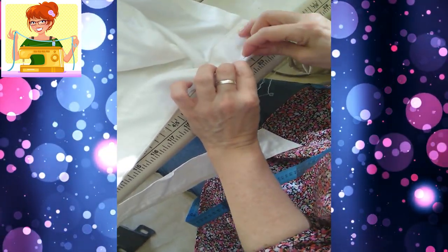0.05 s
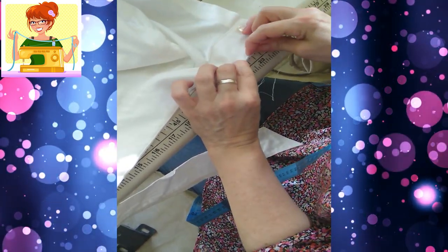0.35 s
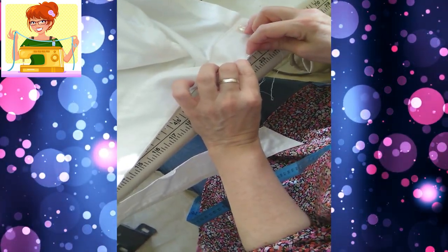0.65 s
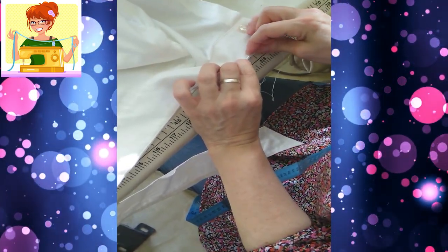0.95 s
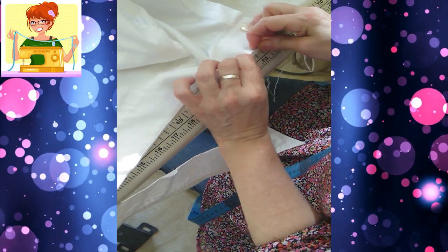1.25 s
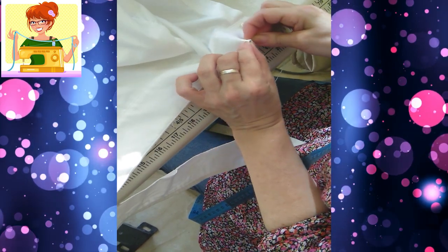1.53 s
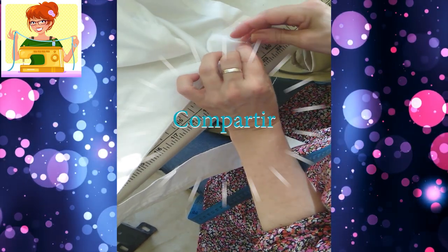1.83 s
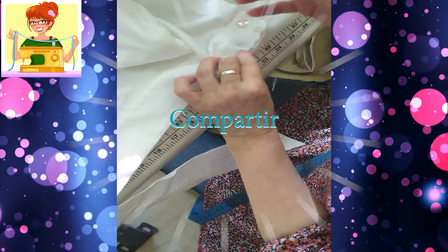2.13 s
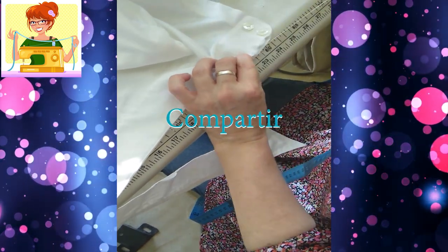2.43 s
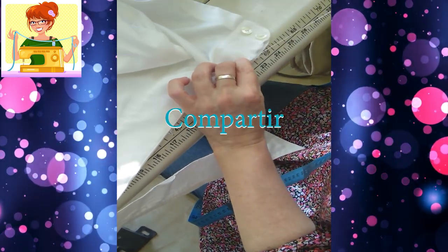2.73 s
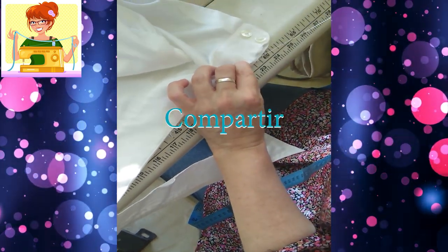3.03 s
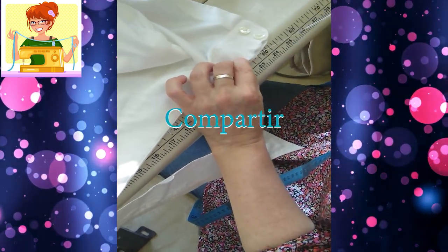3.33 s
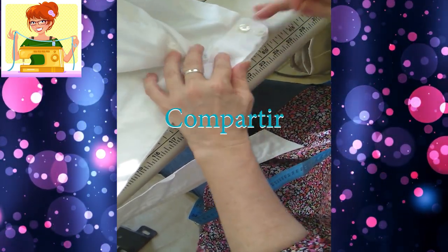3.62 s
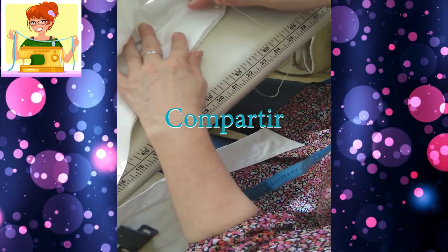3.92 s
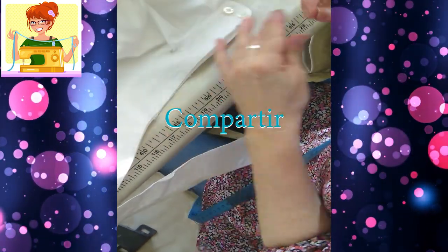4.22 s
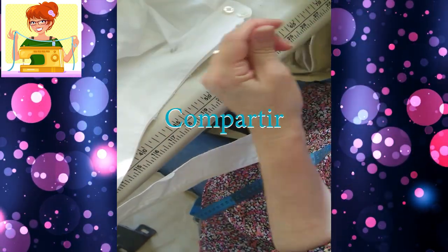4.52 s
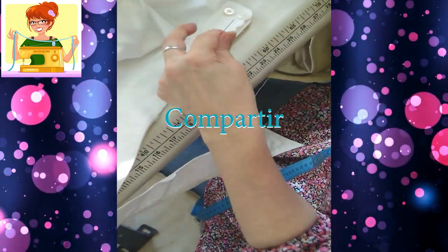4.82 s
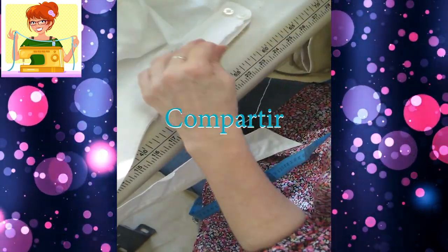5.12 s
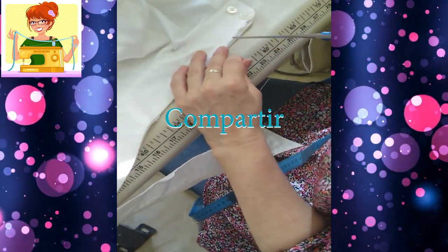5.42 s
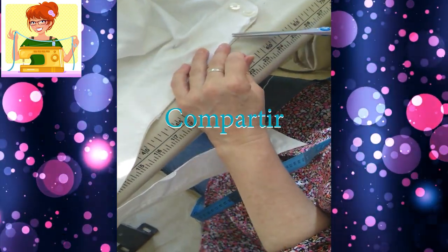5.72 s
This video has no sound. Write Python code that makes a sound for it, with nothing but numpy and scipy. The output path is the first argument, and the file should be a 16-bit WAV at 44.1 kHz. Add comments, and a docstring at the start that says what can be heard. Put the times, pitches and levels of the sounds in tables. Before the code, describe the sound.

Hands push and shift cloth on a table with dull thumps and faint rustling, then scissors click twice, over a low hum.

```python
"""Hands press and shift a shirt on a sewing table, close to the microphones. Pushes, firm and soft, with slips
between them, travel through the table as dull thumps, nearly all in the left channel, and leave its top
ringing. The cloth rustles, scratches and scuffs faintly. Near the end scissors click twice as they are picked
up, steel knocking on steel. Mains hum, room air and hiss go on underneath, with thin tones flickering high in
the treble."""
import sys
import numpy as np
from scipy import signal
from scipy.fft import rfft, irfft
from scipy.io import wavfile
from scipy.ndimage import uniform_filter1d

SR = 44100
rng = np.random.default_rng(int(sys.argv[2]) if len(sys.argv) > 2 else 0)


def output_pcm(signal):
    """Save a mono or channel-first signal as 16-bit PCM at the path in sys.argv[1].

    Samples are clipped to [-1, 1] before scaling.
    """
    pcm = np.clip(np.atleast_2d(signal).T, -1, 1) * 32767
    wavfile.write(sys.argv[1], SR, np.round(pcm).astype(np.int16))


N = 262836
T = np.arange(N) / SR

# the hands drag the cloth between pushes: (start [s], length [s], level [dB])
HAND_DRAGS = [(0, 0.048, -11.5), (0.179, 0.044, -17), (0.274, 0.053, -12.5), (0.569, 0.054, -19),
              (.655, 0.093, -15), (.735, 0.097, -19), (1.007, 0.084, -26), (1.158, 0.063, -21),
              (1.413, 0.11, -23.5), (1.616, 0.062, -27.5), (1.81, 0.078, -31), (2.176, 0.035, -31),
              (2.298, 0.045, -32.5), (2.42, 0.046, -35.5), (2.545, 0.056, -29), (2.813, 0.098, -39),
              (3.046, 0.096, -33.5), (3.41, 0.055, -19), (3.502, 0.072, -30), (3.598, 0.073, -28),
              (3.693, 0.038, -22.5), (4.003, 0.13, -35.5), (4.21, 0.071, -23), (4.69, 0.11, -28.5),
              (4.957, 0.041, -34), (5.138, 0.069, -31), (5.322, 0.059, -28), (5.632, 0.12, -23),
              (5.777, .16, -27)]


def undb(db):
    """Turn decibels into a number to multiply by."""
    return 10 ** (np.asarray(db) / 20)


def unit(x):
    """Scale a signal to an average (rms) size of 1."""
    return x / np.sqrt(np.mean(x ** 2))


def colour(x, hz, db):
    """Make some pitches louder and others softer, along a curve through the given points."""
    bin_hz = np.maximum(np.fft.rfftfreq(N, 1 / SR), 1)
    curve_db = np.interp(np.log(bin_hz), np.log(hz), db)
    return irfft(rfft(x) * undb(curve_db), N)


def band(x, hz, width_hz):
    """Keep the sound near one pitch by passing it through a resonance three times."""
    for _ in range(3):
        x = signal.lfilter(*signal.iirpeak(hz, hz / (2 * width_hz), fs=SR), x)
    return x


def walk(per_s):
    """A random wander of size about 1 that takes a new turn per_s times a second."""
    step = int(SR / per_s)
    stairs = np.repeat(rng.standard_normal(N // step + 1), step)
    return unit(uniform_filter1d(stairs, step)[:N])


def leftish(x, right_db):
    """A sound that reaches the right channel weaker than the left."""
    return np.array([x, x * undb(right_db)])


def effort_db(rise_db_per_s=904, fall_db_per_s=343, rest_db=-40.0):
    """How hard the hands drag: effort builds, holds and dies away; resting hands still stir a little."""
    t = T[::64]
    level = np.full(len(t), rest_db)
    for start, length, db in HAND_DRAGS:
        before = rise_db_per_s * np.maximum(start - t, 0)
        after = fall_db_per_s * np.maximum(t - start - length, 0)
        level = np.maximum(level, db - before - after)
    return np.interp(T, t, level)


def pushes(slip_gap_s=0.019, slip_hz=108, scatter=0.091, spread_db=1):
    """List the distinct pushes and knocks, and add the slips between them as a dragging hand sticks and lets
    go."""
    # distinct pushes and knocks of the hands on the table, firm and soft: (time [s], level [dB], thump pitch
    # [Hz])
    listed_pushes = [(.009, -16, 167), (0.038, -20, 171), (.196, -15, 97), (0.226, -20, 90),
                     (0.276, -12, 138), (0.3, -12.5, 130), (.322, -9, 119), (0.381, -25.5, 108),
                     (.577, -18, 156), (0.601, -15.5, 145), (.657, -10, 150), (.672, -10, 108),
                     (0.714, -33, 93), (0.739, -13.5, 90.6), (0.762, -18, 85.5), (0.781, -13.5, 108),
                     (.803, -13, 112), (1.04, -23, 97), (1.081, -28, 101), (1.178, -14, 112),
                     (1.222, -27, 93), (1.32, -29, 103), (1.42, -8, 122), (1.459, -15.5, 115),
                     (1.487, -17, 119), (1.511, -22.5, 96), (1.64, -24, 86), (1.658, -19.5, 108),
                     (1.826, -29, 117), (1.851, -26, 122), (1.867, -20.5, 99), (2.191, -27.5, 79.6),
                     (2.272, -39.5, 85), (2.32, -20, 125.5), (2.47, -29.5, 93), (2.578, -18.5, 118),
                     (2.829, -36.5, 86), (2.885, -31.5, 91), (3.08, -35, 210), (3.091, -30, 105),
                     (3.238, -36.5, 87), (3.379, -40, 85.5), (3.414, -21.5, 132), (3.438, -17, 109),
                     (3.462, -24, 114), (3.546, -28, 119), (3.597, -19, 102), (3.621, -19.5, 108),
                     (3.653, -28, 85), (3.697, -19, 109), (3.717, -17.5, 108), (3.924, -38, 94),
                     (3.981, -33.5, 95), (4.009, -22.5, 121), (4.167, -33, 102), (4.22, -14, 125),
                     (4.255, -18, 80.5), (4.278, -29.5, 69.5), (4.429, -33, 102), (4.485, -43.5, 86),
                     (4.692, -22.5, 90.4), (4.732, -21, 111), (4.79, -39, 128), (4.982, -25.5, 88),
                     (5.153, -26, 88), (5.174, -23, 82), (5.329, -26, 98), (5.361, -19, 107),
                     (5.632, -17.5, 151.4), (5.688, -13, 120), (5.734, -12.5, 103), (5.81, -25, 112),
                     (5.87, -22, 108), (5.909, -26, 94)]
    rows, steps = list(listed_pushes), np.arange(10)
    listed_s = np.array(listed_pushes)[:, 0]
    for start, length, db in HAND_DRAGS:
        late, strength, pitch = rng.standard_normal((3, len(steps)))
        times = start + slip_gap_s * (steps + scatter * late)
        slips = np.column_stack([times, db + spread_db * strength, slip_hz * np.exp(scatter * pitch)])
        clear_of_pushes = np.abs(times[:, None] - listed_s).min(axis=1) > slip_gap_s / 2
        rows += list(slips[clear_of_pushes & (times < start + length)])
    return rows


def thumps(thump_cycles=0.47, knock_hz=255, knock_cycles=0.49, phase_rad=0.52):
    """Each push bends the table for about one swing; firm ones add a short woody knock."""
    force = np.zeros(N)
    for s, db, hz in pushes():
        near = slice(max(int((s - .04) * SR), 0), int((s + .04) * SR))
        knock_db = 1.53 * db - 14  # grows faster than the thump as the push gets firmer
        for pitch, size_db, cycles in (hz, db, thump_cycles), (knock_hz, knock_db, knock_cycles):
            turns = (T[near] - s) * pitch
            swell = np.exp(-.5 * (turns / cycles) ** 2)
            force[near] -= undb(size_db) * swell * np.cos(2 * np.pi * turns + phase_rad)
    return force


def rumble(level_db=-12):
    """Cloth drags under the hands and makes the wood rumble."""
    # tone of the rumble through the table: (pitch [Hz], level [dB])
    rumble_curve = [(20, 18), (40, -25), (62, 8), (90, -1), (130, 4), (200, -4), (300, -24.5), (600, -69)]
    noise = unit(colour(rng.standard_normal(N), *np.transpose(rumble_curve)))
    return undb(effort_db() + level_db) * noise


def table(force, damping_per_s=6.3, damping_at_db=-18, wander_share=0.015):
    """The table passes the force on; the hands muffle it, and its ringing wanders slightly in pitch."""
    # notes of the free table top: (pitch [Hz], level [dB], time to fade by 60 dB [s])
    top_notes = [(61.5, 0, 0.24), (82, -10, 0.25), (117.3, -29.5, 0.098), (120.54, -15.5, 0.72),
                 (171.6, -22, 0.43), (230.8, -9.5, 0.17), (295, -26.5, 0.13)]
    out = undb(-1) * colour(force, [35, 58], [-3, 0])  # the slowest part gets through less well
    # the harder the drag, the faster the ringing dies
    extra_decay = damping_per_s * undb(effort_db() - damping_at_db) ** 2
    share_left = np.exp(-np.cumsum(extra_decay) / SR)
    ahead_s = np.cumsum(wander_share * walk(5)) / SR
    for hz, db, fade_s in top_notes:
        pole = np.exp((2j * np.pi * hz - np.log(1000) / fade_s) / SR)
        change = share_left * np.exp(2j * np.pi * hz * ahead_s)
        # divide, then multiply: each push gets only the muffling and wander that come after it
        ringing = change * signal.lfilter([2 * hz / SR], [1, -pole], force / change)
        out += undb(db) * ringing.real
    return leftish(out, right_db=-50)


def rustle(grain_db=2.0, follow_share=0.15):
    """The weave rubs in uneven grains, a little louder when the hands shift more."""
    # bands of cloth noise: (pitch [Hz], width [Hz], level [dB])
    cloth_bands = [(827, 110, -64), (2640, 570, -70.5), (4500, 790, -77)]
    out, swell_db = np.zeros(N), follow_share * effort_db()
    for hz, width, db in cloth_bands:
        grains = rng.standard_normal(N) * undb(grain_db * walk(60) + swell_db)
        out += undb(db) * unit(band(grains, hz, width))
    return leftish(out, right_db=-39)


def fibres(count=190, base_db=-58.5, lowest_hz=880, rise_s=0.005):
    """Tiny dry scratches of cloth and fingers, the higher ones weaker."""
    out, age = np.zeros((2, N)), T[:SR // 16]
    shape = age / rise_s * np.exp(1 - age / rise_s)
    for when, pitch, softness, place in rng.random((count, 4)):
        octaves = 2.2 * pitch
        db = base_db - 1.5 * np.log(.02 + softness) - 6.5 * octaves
        noise = unit(band(rng.standard_normal(len(age)), lowest_hz * 2 ** octaves, width_hz=150))
        start = int(when * (N - len(age)))
        out[:, start:start + len(age)] += leftish(undb(db) * shape * noise, right_db=-2 - 10 * place)
    return out


def room(common_share=0.037, waver_rad_per_hz=0.0054, waver_db=3.0):
    """Steady air, partly the same on both sides, and a hum whose higher tones waver more in pitch."""
    # room air and microphone hiss: (pitch [Hz], left level [dB per Hz], right level [dB per Hz])
    air_curve = [(30, -92, -97), (62, -80, -82), (160, -88, -92), (380, -84.5, -87), (800, -86.5, -95),
                 (1400, -91, -99), (2400, -98.5, -104), (4500, -104, -108), (6200, -108.5, -114),
                 (7300, -101, -112), (8100, -104, -117), (11300, -99, -122), (13000, -109, -121),
                 (15500, -124, -124)]
    # tones of mains hum and a motor: (pitch [Hz], left level [dB], right level [dB])
    hum_tones = [(119, -75, -63), (241, -77, -80), (369.4, -67.5, -72.5), (471, -78, -82),
                 (548.5, -65.5, -90), (600, -84, -83), (660, -77.5, -79), (718, -81, -81.5)]
    air_hz, *sides = np.transpose(air_curve)
    out, common = np.zeros((2, N)), rng.standard_normal(N)
    for side, db in enumerate(sides):
        noise = np.sqrt(common_share) * common + np.sqrt(1 - common_share) * rng.standard_normal(N)
        out[side] = colour(noise, air_hz, db) * np.sqrt(SR / 2)
    for hz, *levels in hum_tones:
        for side, db in enumerate(levels):
            phase = 2 * np.pi * (hz * T + rng.random()) + waver_rad_per_hz * hz * walk(12)
            out[side] += np.sqrt(2) * np.sin(phase) * undb(db + waver_db * walk(9))
    return out


def sizzle(whine_hz=7340, whine_db=-77.5, flicker_db=9, flicker_per_s=17):
    """Thin tones flicker in a few narrow bands high in the treble, over a thin, steady whine."""
    # slow rise and fall of the sizzle: (time [s], level [dB])
    swell_curve = [(0, -73.5), (1.4, -76.5), (2.1, -77.5), (2.65, -67.5), (3.4, -72.5), (3.7, -68),
                   (4.05, -71.5), (4.35, -77), (5.9, -78)]
    # its narrow bands: (pitch [Hz], width [Hz], relative level [dB])
    sizzle_bands = [(10260, 35, 4), (9720, 35, -6), (9570, 50, -0.5), (8970, 56, -4), (12700, 50, -9)]
    out = undb(whine_db) * unit(band(rng.standard_normal(N), whine_hz, width_hz=26))
    swell = undb(np.interp(T, *np.transpose(swell_curve)))
    for hz, width, db in sizzle_bands:
        flicker = undb(flicker_db * np.minimum(walk(flicker_per_s), 1))
        out += undb(db) * swell * unit(band(rng.standard_normal(N), hz, width) * flicker)
    return leftish(out, right_db=-25)


def ticks(rise_s=0.0063, fade_s=0.063, width_share=0.17, roughness=0.73):
    """Fingers and cloth make soft contacts, each with a short, slightly rough ring."""
    # small touches: (time [s], level [dB], pitch [Hz])
    touches = [(0.014, -50.5, 2400), (.185, -47, 890), (.6, -56, 2590), (.925, -47, 1097),
               (1.15, -56, 3940), (1.265, -47, 993), (1.354, -50, 2440), (1.515, -56, 3800),
               (1.55, -58, 2800), (1.7, -57, 2690), (2.525, -45, 1590), (2.706, -51, 1600),
               (3.264, -50.5, 2450), (3.359, -47.5, 1210), (3.77, -55, 3810), (4.196, -39.5, 858),
               (4.755, -50, 1746), (5.185, -43.5, 880), (5.66, -53.5, 2290)]
    out, age = np.zeros(N + SR), T[:SR // 4]
    shape = (1 - np.exp(-age / rise_s)) * np.exp(-np.log(1000) * age / fade_s)
    for s, db, hz in touches:
        grain = unit(band(rng.standard_normal(len(age)), hz, width_share * hz))
        tone = 2 * np.sin(2 * np.pi * hz * age)
        start = int(s * SR)
        out[start:start + len(age)] += undb(db) * shape * (tone + roughness * grain)
    return leftish(out[:N], right_db=-30)


def scuffs(width_share=0.21, skew=0.71, drift_share=0.016):
    """Things moved about scuff faintly: a broad rub that narrows to a tone the more it squeaks."""
    # rubs: (time [s], level [dB], pitch [Hz], length [s], left minus right [dB], squeakiness [0-1])
    rubs = [(1, -53.5, 584, 0.096, 7, 0.2), (1.108, -58, 2640, 0.068, 21, 0.81),
            (1.665, -49, 887, 0.048, 23, 0.67), (1.985, -48.5, 1660, 0.031, 24, 0.68),
            (2.54, -69, 1590, 0.16, 29, 0.7), (3.926, -45, 518, 0.11, 39, 0.57),
            (4.193, -47.5, 542, 0.085, 31, 0.2), (4.277, -59.5, 2380, 0.043, 18, .7),
            (4.301, -54, 1350, 0.08, 19, 0.96), (4.76, -45.5, 507, 0.056, 19, .1),
            (5.469, -48, 649, 0.048, 17, .4), (5.595, -41.5, 659, 0.062, 36, 0.7),
            (5.592, -54.5, 1594, 0.088, 15, 0.94), (5.623, -52, 673, 0.13, 13, 0.4),
            (5.775, -54.5, 1178, 0.04, 22, 0.56), (5.833, -49.5, 666, 0.065, 31, 1),
            (5.892, -43, 662, 0.072, 28, 0.82)]
    out, drift = np.zeros((2, N)), 1 + drift_share * walk(99)
    for s, db, hz, length, pan_db, squeak in rubs:
        squeak = min(squeak, .9)  # some rubbing noise always remains
        noise_share = 1 - squeak ** 2
        swell = np.sin(np.pi * np.clip((T - s) / length, 0, 1) ** skew)
        tone = np.sqrt(2) * np.sin(2 * np.pi * np.cumsum(hz * drift) / SR)
        noise = unit(band(rng.standard_normal(N), hz, width_share * hz * noise_share))
        rub = squeak * tone + np.sqrt(noise_share) * noise
        out += leftish(undb(db) * swell * rub, right_db=-pan_db)
    return out


def strike(s, fade_s, echo_db, direct_db, hold=1.4):
    """A sharp contact and its dense room echoes, different on each side, which hold briefly and fade."""
    hit, start, age = np.full((2, N), 1e-18), int(s * SR), T[:SR // 2]
    for side in hit:
        echoes = rng.standard_normal(len(age)) * np.exp(-np.log(1000) * (age / fade_s) ** hold)
        side[start:start + len(age)] += undb(echo_db) * echoes / np.linalg.norm(echoes)
        side[start] += undb(direct_db)
    return hit


def ring(s, hz, fade_s):
    """One pure note, struck at time s, that fades by 60 dB in fade_s seconds."""
    age = np.maximum(T - s, 0)
    return np.sin(2 * np.pi * hz * age) * np.exp(-np.minimum(np.log(1000) * age / fade_s, 20))


def scissors(steel_db=13, snap_db=6, lift_s=4.9045, lift_db=-27):
    """The handles sound as the scissors leave the table; then steel knocks on steel and rings."""
    # clicks of the scissors: (time [s], level [dB], hardness [0-1], time to fade by 60 dB [s])
    clicks = [(4.9211, -5, 0.79, 0.22), (5.2194, -9, 0.07, 0.25), (5.2263, -21, 0, 0.23)]
    # resonances of the steel: (pitch [Hz], width [Hz], hard knock level [dB], light tick level [dB])
    steel_bands = [(3950, 350, -16, -40), (4720, 300, -6, -31), (5250, 300, -11, -33), (6230, 400, -7, -38),
                   (9330, 860, 5.5, -45), (10000, 190, -16, 8.5), (10200, 270, -14, 0), (10870, 360, 5, -4),
                   (11700, 830, 7, -38), (12550, 400, -22, -10), (14200, 1600, -11, -30)]
    # thin rings of the blades after a hard knock: (pitch [Hz], level [dB], time to fade by 60 dB [s])
    blade_notes = [(3680, -48.5, 0.25), (4750, -48, 0.22), (6099, -56, 0.28), (7970, -46.5, .2),
                   (9706, -47, .2), (10600, -43, .29), (11060, -37, 0.29), (11300, -47, .33),
                   (11860, -50, .32), (14290, -47, .12)]
    # tone of the snap of a hard contact: (pitch [Hz], level [dB])
    snap_curve = [(3500, -23), (4800, -12), (8000, -11.5), (10500, 9), (12000, 4), (13000, -6),
                  (16000, -10)]
    # resonances of the handles: (pitch [Hz], width [Hz], level [dB])
    handle_bands = [(2380, 150, 14), (3720, 300, 5), (4560, 370, 3)]
    out = np.zeros((2, N))
    for s, db, hardness, fade_s in clicks:
        for hz, width, knock_db, tick_db in steel_bands:
            hit = strike(s, fade_s, echo_db=-0.2, direct_db=-0.5)
            band_db = hardness * knock_db + (1 - hardness) * tick_db
            out += undb(db + steel_db + band_db) * band(hit, hz, width)
        for hz, ring_db, ring_s in blade_notes:
            out += undb(db + ring_db) * hardness * ring(s, hz, ring_s)
        # a hard knock also snaps, before the steel has time to ring
        contact = undb(db + snap_db) * hardness * (np.arange(N) == int(s * SR))
        out += colour(contact, *np.transpose(snap_curve))
    for hz, width, db in handle_bands:
        lift = strike(lift_s, fade_s=.13, echo_db=13, direct_db=8)
        out += undb(lift_db + db) * band(lift, hz, width)
    # the right microphone is shaded from the highest ring
    out[1] = colour(out[1], hz=[2400, 4650, 6500, 9000, 12000, 15000], db=[-10, -0.5, -13, -25, -32, -12])
    return out


def scene(dip_s=2.12, dip_width_s=0.05, dip_db=-3.5):
    """Everything on and around the table; the level dips briefly once."""
    dip = undb(dip_db * np.exp(-((T - dip_s) / dip_width_s) ** 2))
    wood = table(thumps() + rumble())
    handling = rustle() + fibres() + ticks() + scuffs()
    return dip * (wood + handling + scissors() + room() + sizzle())


def record(dry, bottom_hz=12, top_hz=15750):
    """The recorder drops the deepest bass and cuts the highest treble."""
    bass_cut = signal.butter(1, bottom_hz, "high", fs=SR, output="sos")
    treble_cut = signal.ellip(10, .2, 80, top_hz, fs=SR, output="sos")
    return signal.sosfilt(treble_cut, signal.sosfilt(bass_cut, dry))


dry = scene()
out = record(dry)
output_pcm(out)
```